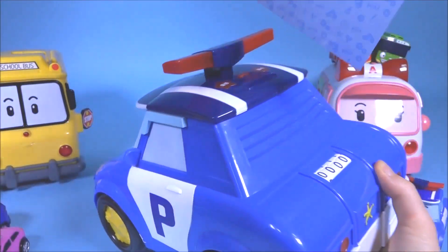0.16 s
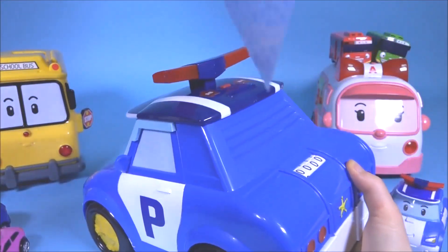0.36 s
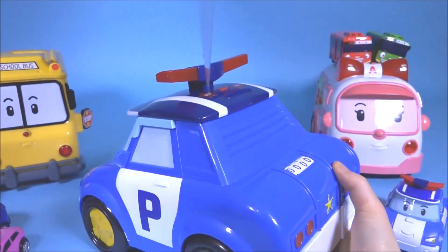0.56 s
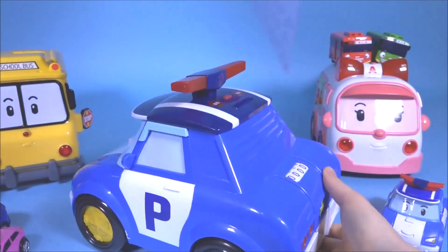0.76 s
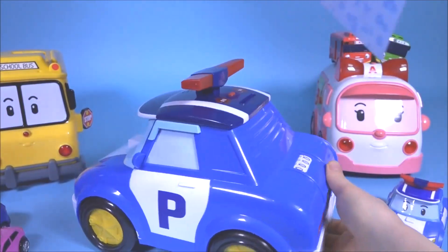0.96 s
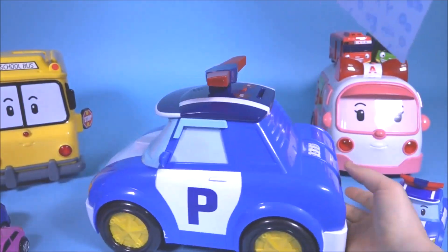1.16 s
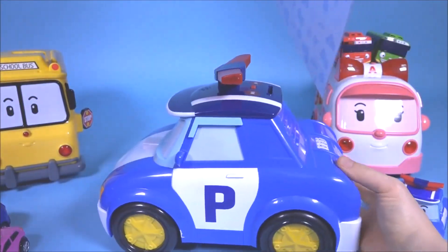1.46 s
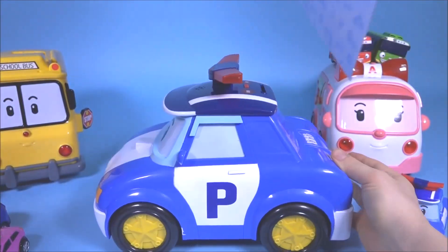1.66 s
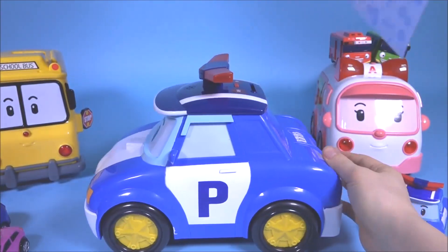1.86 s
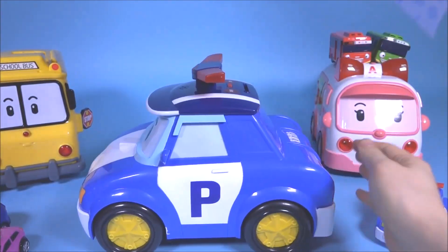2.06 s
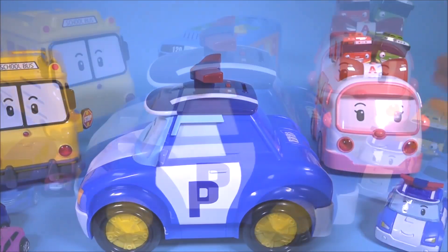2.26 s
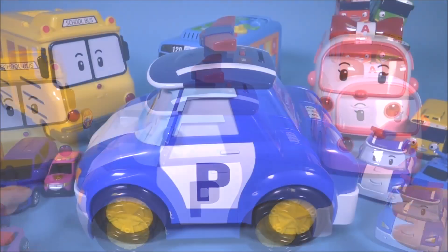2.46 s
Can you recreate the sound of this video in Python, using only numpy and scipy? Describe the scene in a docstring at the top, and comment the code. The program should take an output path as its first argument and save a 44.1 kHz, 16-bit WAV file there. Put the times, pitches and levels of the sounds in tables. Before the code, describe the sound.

A hollow plastic toy car is turned by hand on a card-covered table: rustle and ticks first, then clunks and short scrapes, one loudest, then near quiet with a faint squeak; close stereo microphones, small room.

```python
"""Rustling hands and card over a low rumble are heard first, with a few card ticks; then a big hollow plastic
toy car is turned by hand and set down on a card-covered table in a small room. Impacts and stick-slip drags
excite the damped modes of its shell, soft pushes those of the table; ticks and rustle are shaped noise.
Late on the handling fades, something is dragged far to the right and a wheel, a wavering sine, squeaks faintly."""
import sys
import numpy as np
from scipy import signal
from scipy.fft import rfft, irfft
from scipy.io import wavfile
from scipy.ndimage import uniform_filter1d

SR = 44100
rng = np.random.default_rng(int(sys.argv[2]) if len(sys.argv) > 2 else 0)


def generate_wav(sig):
    """Save sig (samples, or channels by samples) to the path in sys.argv[1] as 16-bit PCM at SR."""
    pcm = np.round(np.clip(np.atleast_2d(sig).T, -1, 1) * 32767).astype(np.int16)
    wavfile.write(sys.argv[1], SR, pcm)


def gain_from_db(level_db):
    """Convert decibel levels to linear amplitude factors (20 dB per decade)."""
    decades = np.asarray(level_db, float) / 20
    return 10 ** decades


N = 114660  # samples, 2.6 s
FLIP = np.array([[1], [-1]])  # opposite signs left and right


def curve(table, col):
    """Linear interpolation: straight lines between the rows of a time table."""
    rows = np.array(table, float)
    return np.interp(np.arange(N) / SR, rows[:, 0], rows[:, col])


def unit(x):
    """Normalisation: scale to rms 1."""
    return x / np.sqrt(np.mean(x ** 2))


def colour(x, points, lo=0, hi=1e5):
    """Spectral shaping: gains from (Hz, dB) points, kept between lo and hi Hz with soft edges."""
    hz = np.arange(N // 2 + 1) * SR / N + 1
    p = np.array(points, float)
    gain = gain_from_db(np.interp(np.log(hz), np.log(p[:, 0]), p[:, 1]))
    edges = np.sqrt((1 + (lo / hz) ** 8) * (1 + (hz / hi) ** 8))
    return irfft(rfft(x) * gain / edges, N)


def widen(mid, side, width):
    """Mid/side stereo: the side signal enters left and right with opposite signs."""
    return mid + width * side * FLIP


def pan(db):
    """Level panning: left and right gains that differ by db and sum to 2."""
    left, right = gain_from_db(db / 2), gain_from_db(-db / 2)
    return np.array([[left], [right]]) * 2 / (left + right)


def add(out, start_s, x, pan_db):
    """Superposition: mix x in at start_s."""
    i = int(max(start_s, 0) * SR)
    out[:, i:i + x.shape[-1]] += (pan(pan_db) * x)[:, :N - i]


def walk(rate):
    """Random modulation: smoothed chance steps, rate per second, rms 1."""
    k = int(SR / rate)
    steps = np.repeat(rng.standard_normal(N // k + 1), k)
    return unit(uniform_filter1d(uniform_filter1d(steps, k), k)[:N])


SLIPS_PER_S = 1700


def slips(count):
    """Stick-slip friction: sparse clicks of random sign and uneven size, scaled to rms 1."""
    u = rng.random((count, 3))
    happens = u[:, 0] < SLIPS_PER_S / SR
    size_db = np.minimum(-3.45 * np.log(u[:, 2] + 1e-4), 14)  # many small, few large
    return unit(happens * np.sign(u[:, 1] - .5) * gain_from_db(size_db))


def ring(push, modes, db):
    """Modal synthesis: a push drives damped resonators with gains db; a click gives energy near 1."""
    out = 0
    for (hz, _, t60), gain_db in zip(modes, db):
        pole = np.exp(2j * np.pi * hz / SR - np.log(1000) / (max(t60, .005) * SR))
        resonance = signal.lfilter([0, pole.imag], [1, -2 * pole.real, abs(pole) ** 2], push)
        out = out + gain_from_db(gain_db) * resonance
    return out / np.sqrt(np.sum(gain_from_db(np.array(db)) ** 2))


# spectrum of rustle and air: pitch_hz [Hz], level_db [dB per Hz, relative]
RUSTLE_COLOUR = [(15, -29), (25, 3.5), (139, -7.5), (218, -3), (533, -4), (1020, -7.5), (1720, -13),
                 (2040, -13), (5810, -19.5), (9550, -52.5), (12400, -83), (21000, -120)]
AIR_DB = -73


def air():
    """Stationary noise: the steady, smooth air noise of the room."""
    mid, side = (unit(colour(rng.standard_normal(N), RUSTLE_COLOUR, 360)) for _ in range(2))
    return gain_from_db(AIR_DB) * widen(mid, side, .4)


# rumble of the handled table: start_s [s], level_db [dB]
RUMBLE = [(0.0, -56), (0.04, -55), (0.8, -54.5), (1.7, -58), (1.74, -47.5), (2.12, -63.5), (2.39, -55),
          (2.6, -55.5)]


def rumble():
    """Low-passed noise: a deep rumble of varying level, partly different left and right."""
    spectrum = [(15, -3.0), (35, -5), (60, 0.5), (90, 0)]  # (Hz, dB)
    mid, side = (unit(colour(rng.standard_normal(N), spectrum, 0, 100)) for _ in range(2))
    return gain_from_db(curve(RUMBLE, col=1)) * widen(mid, side, .6)


ROOM_DB, ROOM_T60_LOW_S, ROOM_T60_HIGH_S, ROOM_WIDTH = -14, 0.23, 0.18, 0.41


def room(x):
    """Diffuse reverberation: convolution with decaying noise, the treble dying first."""
    t = np.arange(SR // 2) / SR
    noise = rng.standard_normal((2, len(t)))
    low = signal.lfilter(*signal.butter(2, 1500, fs=SR), noise)
    tail = low * gain_from_db(-60 * t / ROOM_T60_LOW_S) + (noise - low) * gain_from_db(-60 * t / ROOM_T60_HIGH_S)
    tail = tail * np.clip(t / 0.018, 0, 1)  # echoes build up over 18 ms
    tail = tail / np.sqrt(np.sum(tail ** 2) / 2)
    tail = widen(tail[0], tail[1], ROOM_WIDTH)
    return gain_from_db(ROOM_DB) * signal.fftconvolve(x, tail, axes=1)[:, :N]


# rustle of hands and card: start_s [s], low_db [dB], middle_db [dB], high_db [dB], left_minus_right_db [dB]
RUSTLE = [(0.0, -53, -40.5, -43, 2), (0.1, -48.5, -47, -49, -6.5), (0.25, -48.5, -44.5, -45.5, 0.5),
          (0.44, -52.5, -62, -59.5, -3), (0.62, -44.5, -43.5, -56.5, 1), (0.78, -50.5, -47.5, -52, -2),
          (0.97, -49, -48.5, -58.5, -1.5), (1.2, -48.5, -55.5, -57, 2), (1.43, -51, -53, -66, -5),
          (1.56, -50, -49, -58.5, 0.5), (1.71, -51.5, -46.5, -51, -1), (1.82, -44.5, -41, -51, 0.5),
          (1.96, -57, -59, -65, 0), (2.05, -57.5, -63, -65, -1), (2.25, -65.5, -62.5, -73.5, 2.5),
          (2.36, -58.5, -63.5, -65.5, -4.5), (2.45, -58.5, -63, -67.5, -14), (2.6, -58, -59.5, -68.5, -15)]
FLICKER_DB, GRAIN_SHARE = 1., 0.4  # spread of the flicker; clicks relative to smooth noise
WIDTH_LOW, WIDTH_HIGH = 0.26, 0.47  # side relative to mid


def rustle():
    """Band-wise modulated friction noise: three gritty, flickering bands, wider in the treble."""
    out = 0
    bands = ((1, 90, 300, WIDTH_LOW), (2, 300, 1500, WIDTH_LOW), (3, 1500, 1e5, WIDTH_HIGH))
    for col, lo, hi, width in bands:
        grit = (rng.standard_normal(N) + GRAIN_SHARE * slips(count=N) for _ in range(2))
        mid, side = (unit(colour(g, RUSTLE_COLOUR, lo, hi)) for g in grit)
        level = gain_from_db(curve(RUSTLE, col) + FLICKER_DB * walk(21))
        out = out + level * widen(mid, side, width)
    lean = gain_from_db(FLIP * curve(RUSTLE, col=4) / 2)
    return out * 2 * lean / lean.sum(axis=0)


# squeak of a wheel: start_s [s], pitch_hz [Hz], level_db [dB]
SQUEAK = [(2.186, 1640, -78), (2.196, 1680, -61), (2.212, 1750, -58), (2.238, 1770, -52),
          (2.248, 1780, -70), (2.28, 1740, -48), (2.32, 1740, -62), (2.332, 1750, -72), (2.35, 1750, -61),
          (2.368, 1750, -74), (2.382, 1735, -61), (2.42, 1800, -63), (2.45, 1780, -67), (2.49, 1770, -67),
          (2.525, 1750, -66), (2.56, 1750, -80)]
SQUEAK_WIDTH_HZ, SQUEAK_PAN_DB = 36, -6  # spread of the wavering; left minus right


def squeak():
    """Frequency modulation: a thin, breathy tone of randomly wavering pitch and level."""
    hz = curve(SQUEAK, col=1) + SQUEAK_WIDTH_HZ * walk(150)
    rough = gain_from_db(2 * walk(120))
    tone = np.sqrt(2) * np.sin(2 * np.pi * np.cumsum(hz) / SR)
    return pan(SQUEAK_PAN_DB) * gain_from_db(curve(SQUEAK, col=2)) * rough * tone


# ticks of the card: start_s [s, begins 2 ms before], level_db [dB peak], pitch_hz [Hz, band centre],
# length_s [s, envelope scale], left_minus_right_db [dB]
TICKS = [(0.064, -21, 2500, 0.0025, -17), (0.2112, -24, 3850, 0.0035, 3.5),
         (0.233, -14.5, 2820, 0.0021, 3.5), (0.239, -28.5, 3000, 0.0046, 2), (0.31, -32.5, 2950, 0.003, 2),
         (0.35, -28, 2940, 0.0011, -0.5), (0.786, -34.5, 4550, 0.00069, -1),
         (1.163, -32, 1980, 0.0021, -19), (1.611, -46.5, 4530, 0.0024, 12), (1.917, -48, 3500, 0.013, 9),
         (1.704, -21, 4190, 0.005, -0.5), (2.019, -34.5, 3100, 0.0018, -4)]
TICK_SPAN, TICK_TOP_HZ = 2.2, 5600  # band edge over centre; low-pass corner


def ticks():
    """Transient noise: band-passed snaps with a quick rise and fall."""
    out, t = np.zeros((2, N)), np.arange(SR // 20) / SR
    dull = signal.butter(5, TICK_TOP_HZ, fs=SR)
    for start_s, db, hz, length, pan_db in TICKS:
        band = signal.butter(1, [hz / TICK_SPAN, hz * TICK_SPAN], "band", fs=SR)
        shape = (t / length) * np.exp(-(t / length) ** 2)
        snap = signal.lfilter(*band, rng.standard_normal(len(t))) * shape
        snap = signal.lfilter(*dull, snap)
        add(out, start_s - .002, gain_from_db(db) * snap / abs(snap).max(), pan_db)
    return out


# modes of the table top: pitch_hz [Hz], level_db [dB, relative], t60_s [s]
TABLE = [(71, -18.5, 0.1), (117.3, -11.5, 0.58), (209.2, -1, 0.087), (260, -0.5, 0.051)]
# thuds of the table top: start_s [s], level_db [dB peak], push_s [s]
THUDS = [(0.401, -23.5, 0.0094), (0.617, -18, 0.021), (0.86, -24.5, 0.018), (1.717, -43, .02)]


def thuds():
    """Modal excitation: soft pushes ring the table top."""
    out, t = np.zeros((2, N)), np.arange(SR // 2) / SR
    for start_s, db, length in THUDS:
        push = np.sin(np.pi * np.clip(t / length, 0, 1)) * np.sin(2 * np.pi * TABLE[2][0] * t + 1)
        body = ring(push, TABLE, [mode[1] for mode in TABLE])
        add(out, start_s, gain_from_db(db) * body / abs(body).max(), -1)
    return out


# spectrum of the contact hiss: pitch_hz [Hz], level_db [dB per Hz, relative]
HISS = [(880, -14), (1350, -5), (2130, -8), (4040, -15), (5140, -12.5), (7170, -26.5), (9550, -49),
        (12400, -73), (21000, -120)]


def contact_hiss():
    """Friction noise: smooth noise and slip clicks in equal parts, coloured, rms 1."""
    return unit(colour(rng.standard_normal(N) + slips(count=N), HISS))


# modes of the plastic shell: pitch_hz [Hz], level_db [dB, relative], t60_s [s]
SHELL = [(240, -8, .07), (310, -7, .05), (415, -5, .045), (455, -2, .06), (492, 1, .055), (555, -3, .04),
         (640, -6, .04), (760, -2, .05), (810, 0, .05), (900, 0, .055), (1000, 0, .04), (1110, 0, .04),
         (1220, -1, .04), (1420, -2, .022), (1720, -3, .02), (2080, -2, .02), (2600, -8, .012),
         (3400, -14, .01), (5000, -16, .008)]
SPOT_DB_PER_OCT2 = 16  # loss away from the favoured pitch, before hardness scales it
SPOT_SCATTER_DB = 2


def spot(hz, hard):
    """Mode coupling: levels for a contact that favours hz; a harder one reaches more modes."""
    steep = SPOT_DB_PER_OCT2 * np.clip(1.05 - hard, .02, 4)
    chance = rng.standard_normal(len(SHELL))
    levels = []
    for (mode_hz, db, _), c in zip(SHELL, chance):
        loss = min(steep * np.log2(mode_hz / hz) ** 2, 30)
        levels.append(db - loss + SPOT_SCATTER_DB * c)
    return levels


# drags of the shell: start_s [s], length_s [s], level_db [dB], pitch_hz [Hz],
# hardness [1 hard, below 0 a soft rub], hiss_db [dB re drag], release_t60_s [s], left_minus_right_db [dB]
DRAGS = [(0, 0.0084, -37, 750, 0.94, -10.5, 0.33, -3), (.379, 0.026, -36, 745, 0.9, -4, 0.055, 3),
         (0.401, 0.018, -28.5, 694, 0.3, -18, 0.17, -1), (0.607, 0.038, -24.5, 904, 0.95, -16, 0.056, -2.5),
         (0.658, 0.034, -32, 1080, 0.7, -20, 0.034, 0), (0.825, 0.05, -30.5, 510, 1.1, -10, 0.046, 0.5),
         (0.862, 0.036, -26, 980, 0.9, -11.5, 0.21, 0.5), (1.098, 0.058, -48, 900, -11, -7.5, 0.035, -6.5),
         (1.158, 0.0036, -39, 680, 0.51, -4.5, 0.21, -11), (1.349, 0.012, -35, 600, 0.74, -22.5, 0.27, 0),
         (1.489, 0.013, -30.5, 614, 0.5, -18, 0.079, -1.5), (1.711, 0.014, -25, 1070, 0.8, -9.5, 0.29, -1),
         (2.018, 0.014, -50.5, 870, 4, -3, 0.14, -2.5), (2.255, 0.023, -46, 1640, 7, 7, 0.08, -22),
         (2.454, 0.065, -47.5, 226, -0.13, -22, 0.13, -39)]
HISS_WIDTH = 0.37


def drags(hiss):
    """Stick-slip excitation: clicks ring the sliding shell; gritty, wider hiss goes with them."""
    out, t = np.zeros((2, N)), np.arange(SR // 2) / SR
    for start_s, length, db, hz, hard, hiss_db, t60, pan_db in DRAGS:
        release = gain_from_db(-60 * np.clip(t - length, 0, None) / max(t60, .01))
        shape = np.clip(t / 0.00082, 0, 1) * release
        body = ring(shape * slips(count=len(t)), SHELL, spot(hz, hard))
        body = body / np.sqrt(np.sum(body ** 2) / np.sum(shape ** 2))
        grit = np.roll(hiss, -int(start_s * SR))
        grit = widen(grit[:len(t)], grit[-len(t):], HISS_WIDTH)  # side from another stretch of hiss
        add(out, start_s, gain_from_db(db) * (body + gain_from_db(hiss_db) * shape * grit), pan_db)
    return out


# knocks on the shell: start_s [s, push centred 1 ms later], level_db [dB, peak of the ringing],
# pitch_hz [Hz, of the struck spot], hardness [higher is harder], crack_db [dB re knock], left_minus_right_db [dB]
KNOCKS = [(.399, -17, 1135, 0.37, -10, 4.5), (.547, -18.5, 1194, 0.33, -21.5, 1),
          (.548, -24, 840, 0, -20, 2.5), (.551, -21.5, 426, 0, -29, -0.5),
          (.607, -19.5, 1050, 0.45, -4.5, -19), (0.828, -20, 534, -.6, -20, 0),
          (.834, -23.5, 570, 0.34, -13, 5), (0.847, -18, 990, 0, -22, 3),
          (0.852, -5.5, 950, 0.36, -21.5, 0.5), (.881, -11.5, 1060, 0.6, -20.5, 2),
          (0.902, -19.5, 900, .7, -22, 1), (1.02, -29, 905, 0, -16, 1.5),
          (1.344, -13.5, 920, 0.27, -27, -1.5), (1.351, -21.5, 630, 0.67, -29, -1.5),
          (1.4841, -10.5, 940, 0.33, -24.5, 1), (1.492, -24.5, 787, 0.8, -20, 7),
          (1.7069, -10.5, 1030, 0.03, -7, 1.5), (1.7082, -16, 503, -.6, -15, 1),
          (1.711, -17, 770, 0, -12, 0.5), (2.259, -34, 403, 0.5, -30, -31),
          (2.28, -35, 1730, -.5, -22, -19)]
CONTACT_SCALE_S = 0.0016  # hardness scales it
RISE_S, BOUNCE_S, BOUNCE_DB, CRACK_S = .004, 0.007386, -17, .0013


def knocks(hiss):
    """Impact excitation: a short push and one bounce ring the shell; a crack goes with the contact."""
    out, t = np.zeros((2, N)), np.arange(SR // 5) / SR
    for start_s, db, hz, hard, crack_db, pan_db in KNOCKS:
        contact = CONTACT_SCALE_S * np.clip(1.1 - hard, .05, 2)

        def blow(at):
            """Contact pulse: a sine under a two-sided exponential centred at this time."""
            return np.exp(-1.3 * abs(t - at) / contact) * np.sin(2 * np.pi * hz * (t - at))

        push = blow(RISE_S) + gain_from_db(BOUNCE_DB) * blow(RISE_S + BOUNCE_S)
        body = ring(push, SHELL, spot(hz, hard))
        burst = np.roll((t / CRACK_S) * np.exp(1 - t / CRACK_S), int(0.002 * SR))
        crack = hiss[int(start_s * SR):][:len(t)] * burst
        knock = body / abs(body).max() + gain_from_db(crack_db) * crack
        add(out, start_s - RISE_S + 0.001, gain_from_db(db) * knock, pan_db)
    return out


def shell():
    """Radiation: small things radiate no deep bass, so knocks and drags are band-limited."""
    hiss = contact_hiss()
    band = signal.butter(2, [170, 6000], "band", fs=SR, output="sos")
    return signal.sosfilt(band, knocks(hiss) + drags(hiss))


def scene():
    """Superposition: everything on the table, its echoes, and the noises around it."""
    near = shell() + thuds() + ticks() + squeak()
    return near + room(near) + rustle() + rumble() + air()


def band_limit(x):
    """A steep low-pass at the top of the band."""
    return signal.sosfilt(signal.butter(12, 9700, fs=SR, output="sos"), x)


TOP_HZ, HUSH_DB = 9100, -111.5  # low-pass corner; hush level before the low-pass


def record(dry):
    """Low-pass filtering: the top rolls off steeply over the scene and a faint added hush."""
    hush = gain_from_db(HUSH_DB) * rng.standard_normal(dry.shape)
    steep = signal.cheby1(8, .5, TOP_HZ, fs=SR, output="sos")
    mix = signal.sosfilt(steep, dry + hush)
    return band_limit(mix)


dry = scene()
out = record(dry)
generate_wav(out)
```